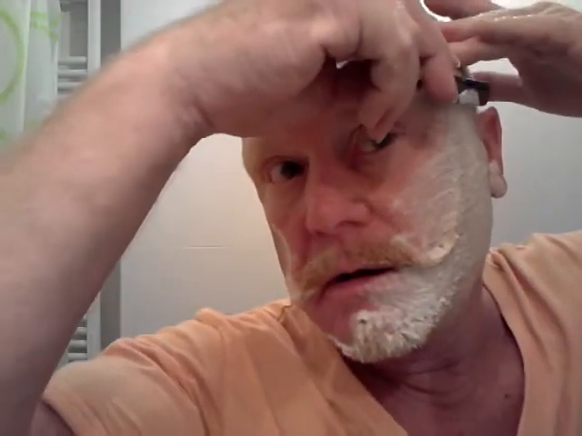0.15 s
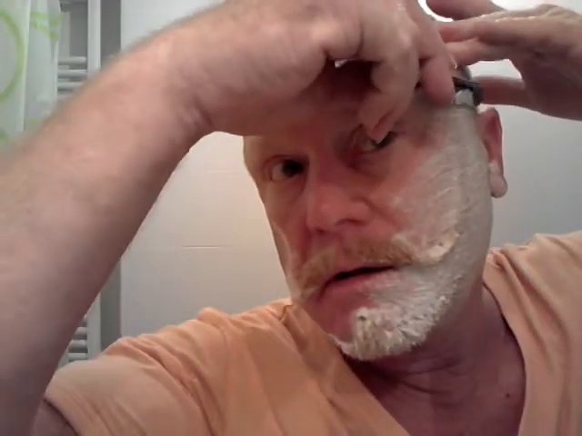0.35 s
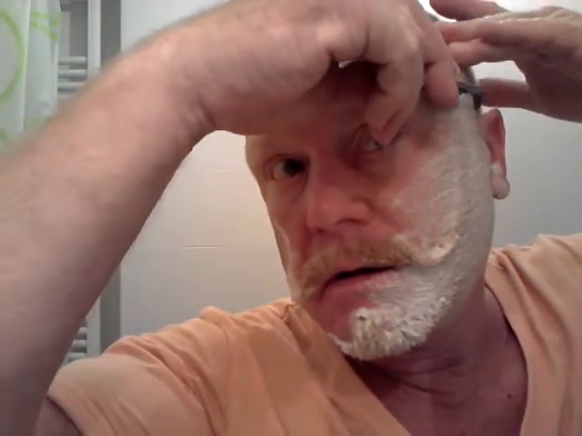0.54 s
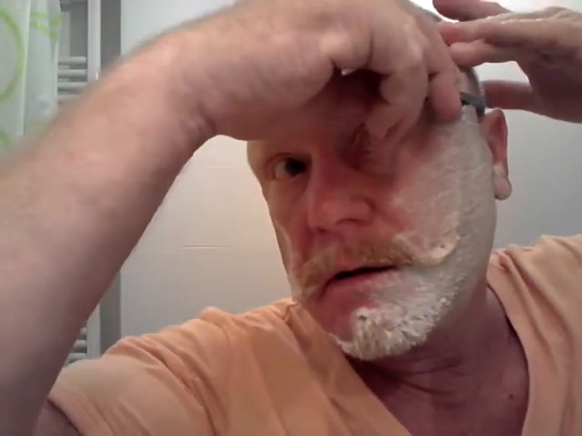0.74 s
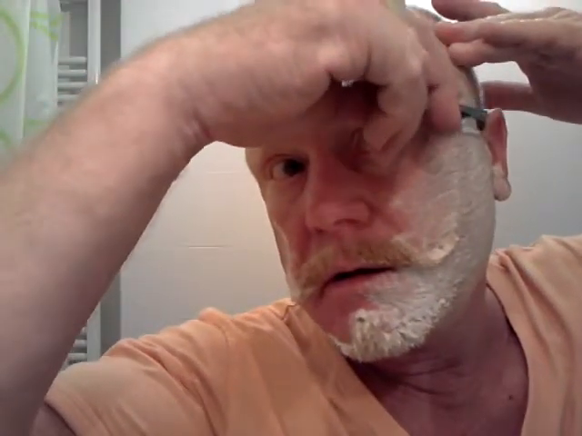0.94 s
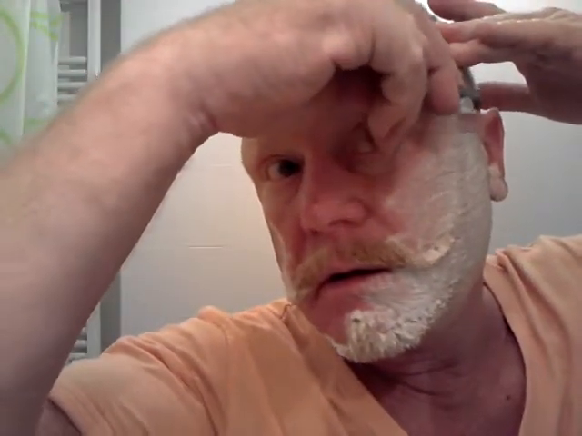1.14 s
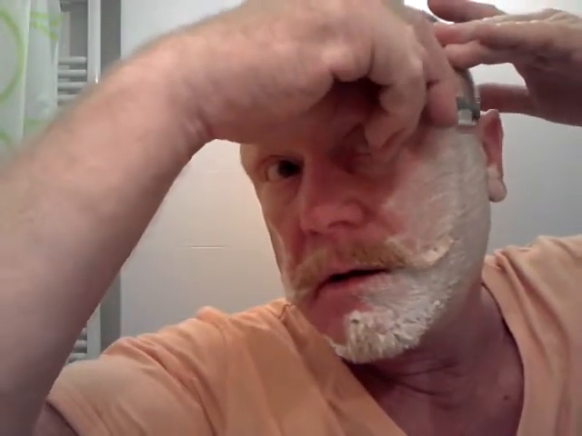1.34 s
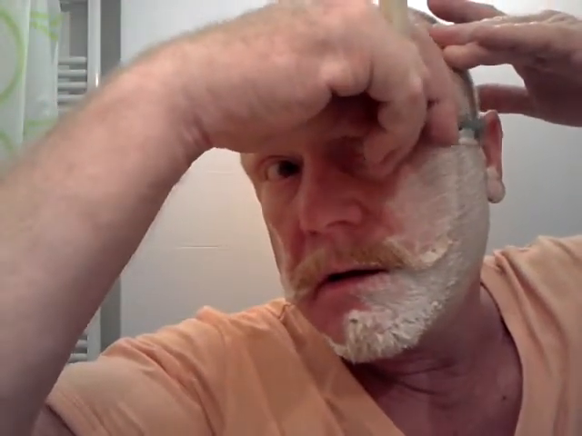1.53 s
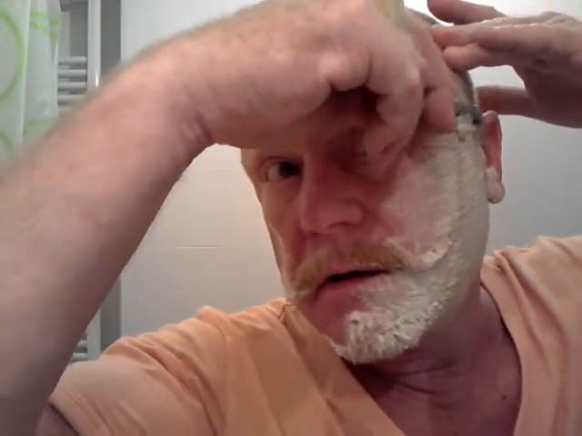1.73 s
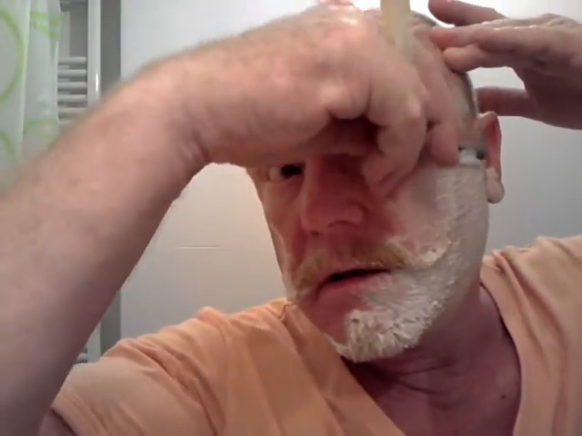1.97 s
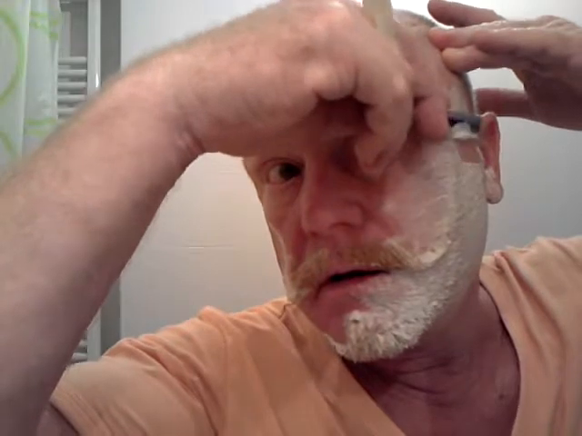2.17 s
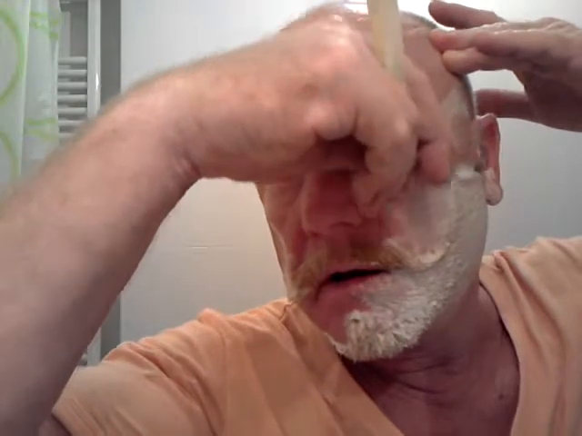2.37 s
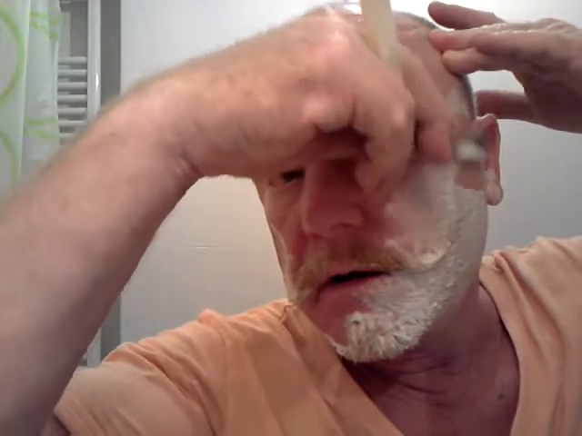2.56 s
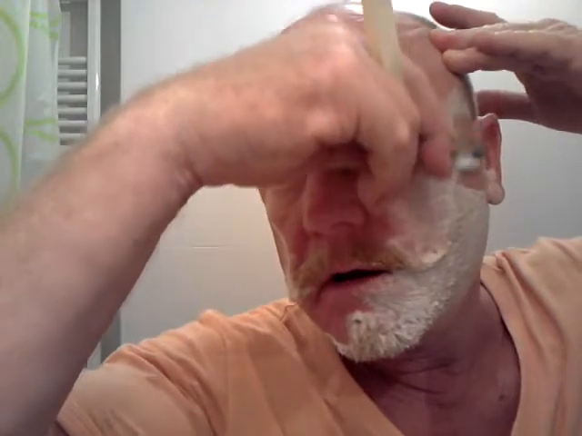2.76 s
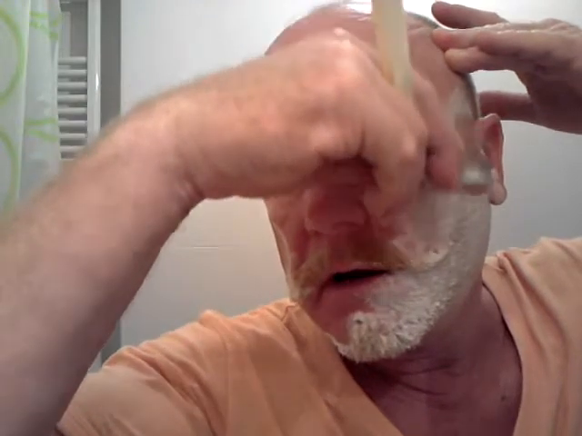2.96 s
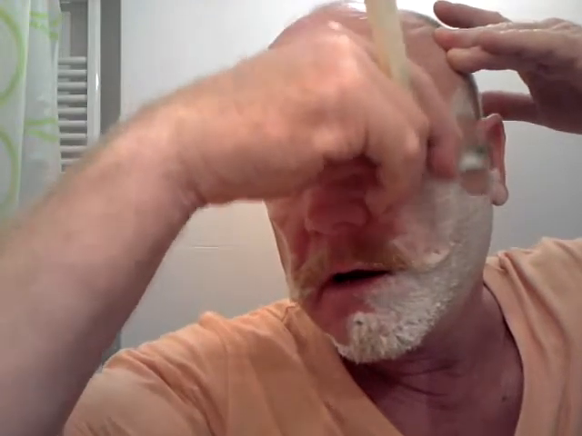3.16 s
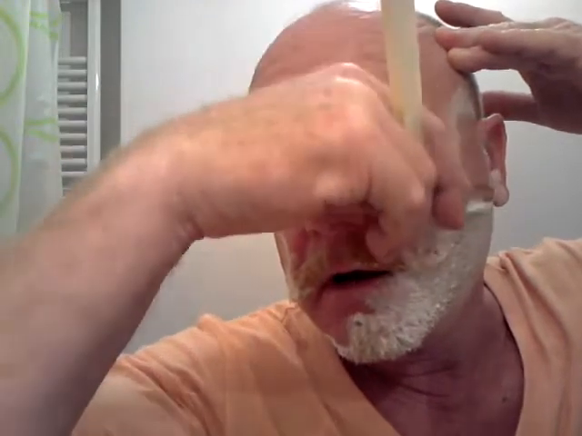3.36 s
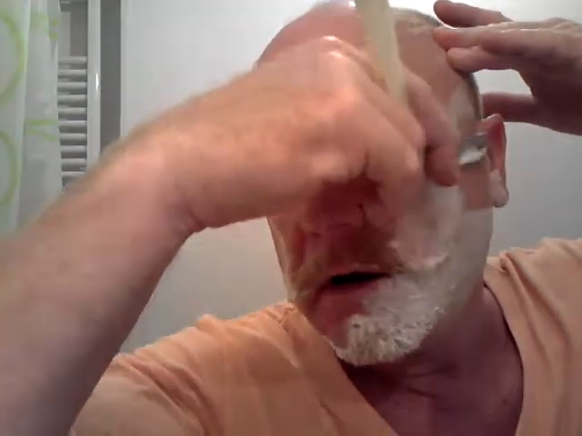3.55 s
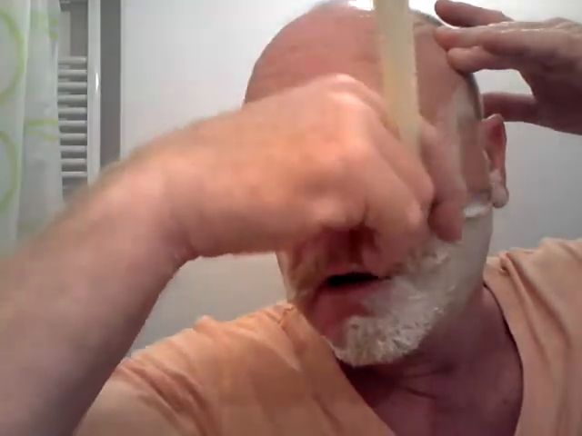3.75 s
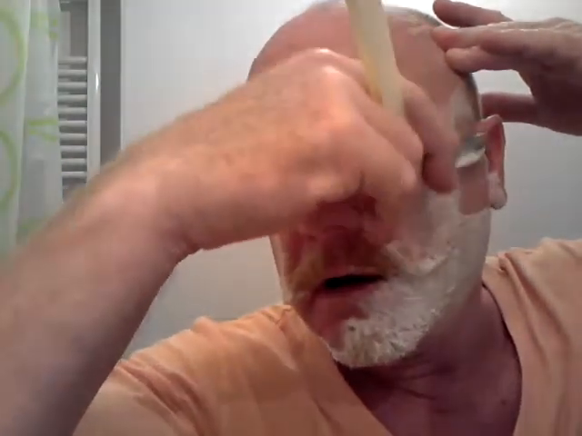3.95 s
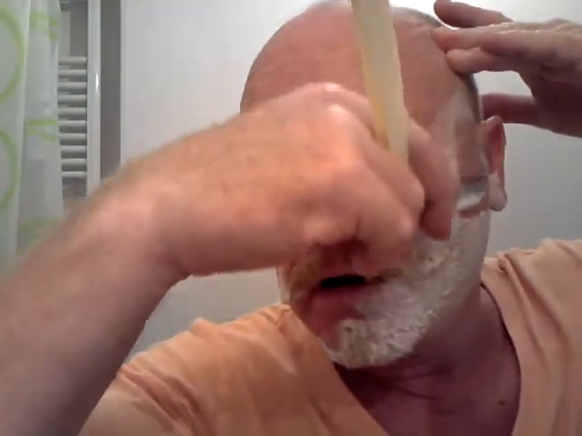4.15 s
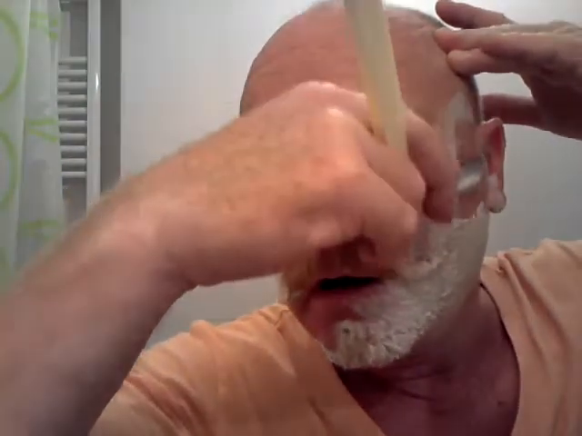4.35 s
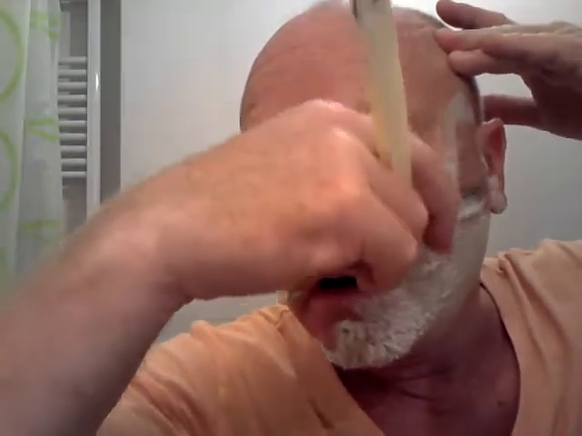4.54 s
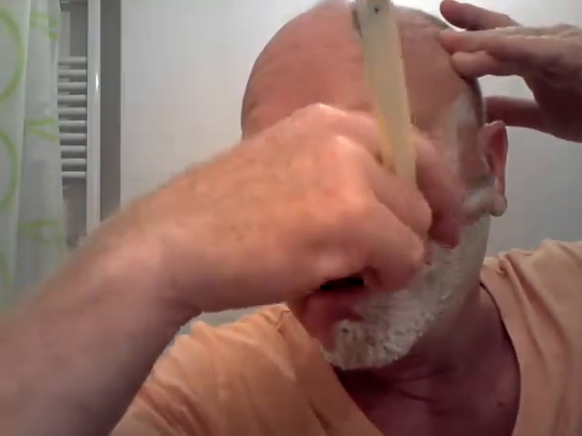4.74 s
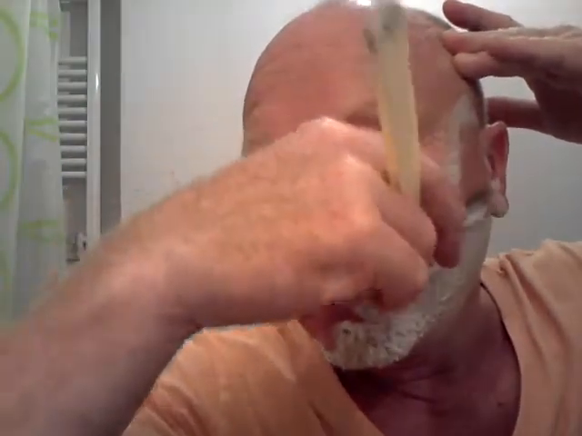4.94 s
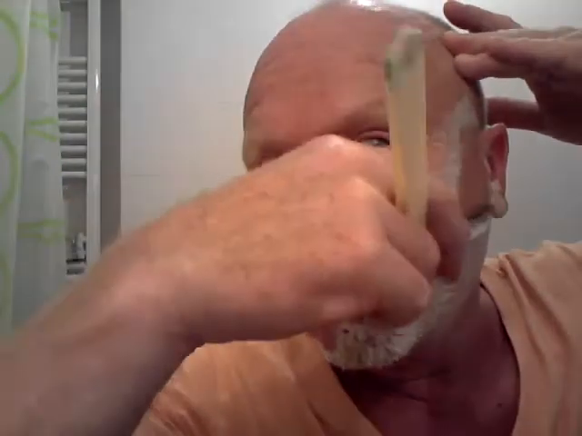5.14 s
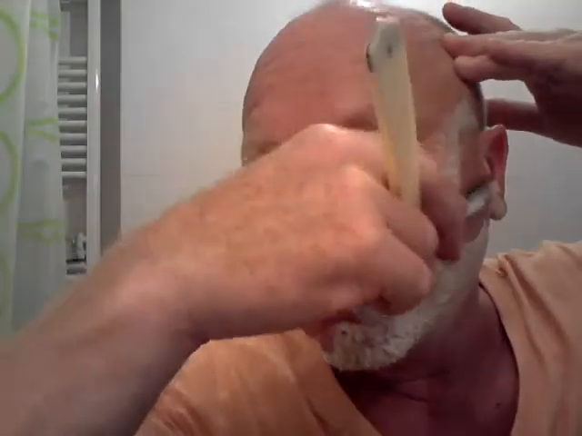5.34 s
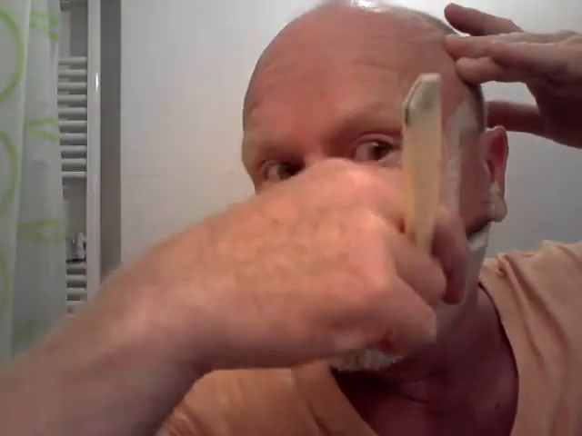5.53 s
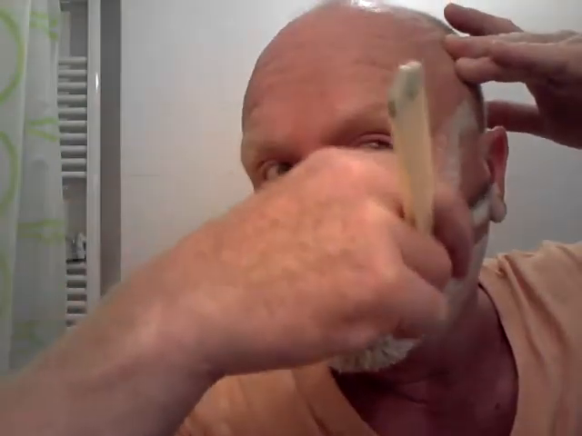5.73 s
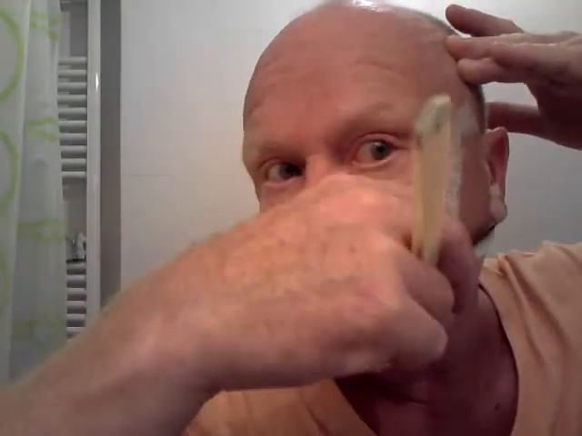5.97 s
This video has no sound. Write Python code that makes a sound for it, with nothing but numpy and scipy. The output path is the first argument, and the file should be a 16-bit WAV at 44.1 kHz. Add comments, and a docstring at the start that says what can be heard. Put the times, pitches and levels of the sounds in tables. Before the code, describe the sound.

Quiet fan air with a faint wavering duct hum runs throughout. Over it, a blade cuts lathered stubble in irregular brief strokes, each biting in quickly and stopping abruptly. Early strokes are thin and hissy; later ones are louder, grittier and dotted with sharp hair snaps. Close stereo pickup in a small reflective bathroom, the treble of the razor stronger on the right.

```python
"""An extractor fan hums steadily in a small tiled bathroom: coloured noise for air, wavering tones for its duct.
Then a straight razor is drawn down a lathered temple and cheek in sixteen short pulls, with soft grazes between.
Every cut hair is a tiny random snap that sets the thin blade ringing, and thick hairs add louder snaps.
The scrape is a fine sizzle at first, then a fuller rasp in the coarse beard; the tiles echo it."""
import sys
import numpy as np
from scipy import signal
from scipy.fft import rfft, irfft, next_fast_len
from scipy.io import wavfile
from scipy.ndimage import uniform_filter1d

SR = 44100
rng = np.random.default_rng(int(sys.argv[2]) if len(sys.argv) > 2 else 0)


def to_wav(sig):
    """Store sig (one row per channel, or 1-D mono) as 16-bit WAV at the path in sys.argv[1].

    Samples outside -1..1 are clipped; the rate is SR.
    """
    pcm = np.clip(np.atleast_2d(sig), -1, 1) * 32767
    pcm = np.round(pcm).astype(np.int16)
    wavfile.write(sys.argv[1], SR, pcm.T)  # frames by channels


N = 269010
TIME = np.arange(N) / SR   # seconds


def from_db(db):
    """Decibels to gain."""
    return 10 ** (np.asarray(db) / 20)


def rms_one(x):
    """Scale to unit rms."""
    return x / np.sqrt(np.mean(x ** 2) + 1e-20)


def at_hz(points, hz):
    """Read a table between its points, on a log-frequency axis."""
    known_hz, values = np.transpose(points)
    return np.interp(np.log(np.maximum(hz, 1)), np.log(known_hz), values)


def pan(left_right_db):
    """Left and right gains of constant total power."""
    gains = from_db(np.array([left_right_db, -left_right_db]).reshape(2, -1) / 2)
    return gains / np.sqrt(np.mean(gains ** 2, axis=0))


def colour(x, gain_at, size=2048):
    """Filter without pre-echo (minimum phase) whose gain is a function of Hz."""
    cepstrum = irfft(np.log(gain_at(np.fft.rfftfreq(size, 1 / SR)) + 1e-9))
    # folding the second half onto the first makes the response start at once
    cepstrum[..., 1:size // 2] *= 2
    cepstrum[..., size // 2 + 1:] = 0
    response = irfft(np.exp(rfft(cepstrum)))
    return signal.fftconvolve(np.atleast_2d(x), np.atleast_2d(response), axes=1)[:, :N]


def resonate(x, hz, width_hz):
    """Two-pole resonance with gain 1 on top."""
    r = np.exp(-np.pi * width_hz / SR)
    feed = np.array([1, 0, -1]) * (1 - r * r) / 2
    feedback = [1, -2 * r * np.cos(2 * np.pi * hz / SR), r * r]
    return signal.lfilter(feed, feedback, x + 1e-18)


def drift(rate_hz):
    """Slow random wandering with rms 1."""
    size = next_fast_len(N)
    hz = np.fft.rfftfreq(size, 1 / SR)
    slow = rfft(rng.standard_normal(size)) / (1 + (hz / rate_hz) ** 2)
    return rms_one(irfft(slow, size)[:N])


# Colour of the fan's air noise, sinking into microphone hiss.
# Each row: frequency in Hz, relative level in dB per Hz.
AIR_COLOUR = [(25, -16), (55, -17), (120, -8), (220, -4), (450, 1), (650, -3.5), (1150, -1.5), (1450, -6),
              (1800, 0.5), (2100, -3.5), (2650, -7), (3400, -13.5), (5500, -17.5), (14500, -17.5)]
AIR_DB = -51.5   # level of the whole air noise, dB rms
# How alike the air noise is at the two microphone ports.
# Each row: frequency in Hz, likeness from -1 (opposite) to 1 (the same).
AIR_LIKENESS = [(40, -0.8), (130, 0.04), (270, 0.5), (550, 0.54), (1100, 0.11), (3000, 0), (14000, 0)]
# Side balance of the air noise. Each row: frequency in Hz, left minus right in dB.
AIR_BALANCE = [(40, 8), (150, 2.5), (300, 1.5), (600, -2), (2000, 0), (5000, 0.5), (14000, -1)]
# Hum of the fan and its duct.
# Each row: frequency in Hz, half-width in Hz, relative level in dB, left minus right in dB.
DUCT_TONES = [(100, 3, -83, 4), (194, 5, -72, 5), (274.5, 5, -63.3, 4), (357, 8, -71, 0), (490, 5, -69, 0),
              (524, 5, -70.5, -2), (552, 10, -70.5, 0), (694, 4, -74.5, -6), (786, 5, -73, -2),
              (819, 4, -71.5, -7), (985, 4, -67.5, -4), (1141, 9, -66, 4), (1310, 12, -72, 3),
              (1412, 16, -71, -6), (1615, 12, -67.5, 0), (1665, 26, -68, -5), (1744, 8, -66.5, -5),
              (1810, 40, -69.5, -1)]


def fan(hum_db=-1.0, tone_db=-4.0, waver=0.709):
    """Rushing air whose likeness left and right varies with pitch, and wavering duct tones in skirts of noise."""
    hz = np.fft.rfftfreq(N, 1 / SR)
    alike = np.clip(at_hz(AIR_LIKENESS, hz), -1, 1)
    mid, side = rfft(rng.standard_normal((2, N)))
    turbulence = np.sqrt((1 + alike) / 2) * mid + np.sqrt((1 - alike) / 2) * side * [[1], [-1]]
    air_shape = rms_one(from_db(at_hz(AIR_COLOUR, hz)))
    power = (from_db(AIR_DB) * air_shape * pan(at_hz(AIR_BALANCE, hz))) ** 2
    tones = 0
    for tone_hz, width_hz, db, left_right_db in DUCT_TONES:
        sides = pan(left_right_db)
        skirt = rms_one(1 / (1 + ((hz - tone_hz) / width_hz) ** 2))
        power = power + (from_db(db + hum_db) * skirt * sides) ** 2
        # the wider the resonance, the faster its phase wanders
        wander = np.cumsum(rng.standard_normal(N)) * np.sqrt(2 * np.pi * width_hz / SR)
        phase = 2 * np.pi * tone_hz * TIME + waver * wander
        tones = tones + from_db(db + tone_db) * sides * np.sqrt(2) * np.sin(phase)
    return irfft(turbulence * np.sqrt(power), N) + tones


# Pulls of the blade.
# Each row: start in seconds, bite-in in seconds, length to the lift in seconds, relative level in dB,
# swell from start to lift in dB, mid-stroke bulge in dB, place of contact from heel 0 to toe 1.
STROKES = [ (0.753, .04, .083, -45.5, 4.5, 0, .1), (0.906, .04, .049, -38, 0, 0, .12),
           (1.390, .027, .264, -49.8, -2.7, 2.6, .37), (1.849, .005, .069, -48.3, -2.5, .5, .2),
           (1.935, .053, .081, -34.2, -2.5, -.5, .35), (2.298, .057, .219, -37.7, 5.5, 2, .62),
           (2.719, .037, .271, -40.9, 4.5, 2, .64), (3.169, .017, .251, -40.1, 3, 4.2, .79),
           (3.623, .068, .213, -35.5, -.4, -1.8, 1), (4.052, .026, .234, -38.2, 3.8, -.7, .54),
           (4.412, .023, .027, -41.8, 0, 0, .45), (4.510, .053, .181, -37.2, -2, 0, .46),
           (4.915, .033, .141, -37.5, -1, 1.6, .44), (5.058, .013, .067, -33.2, -1, .5, .42),
           (5.376, .045, .199, -34.8, -2.5, -3.5, .25), (5.800, .011, .171, -36.4, -6, -2, .05), ]
# Between pulls the blade grazes the lather on its way back.
# Each row: middle in seconds, half-length in seconds, relative level in dB.
GRAZES = [(1.238, 0.034, -61.0), (1.334, 0.024, -56.5), (1.759, 0.041, -53), (2.09, 0.035, -50.5),
          (2.26, 0.065, -54), (4.379, 0.02, -53), (4.776, 0.012, -48.2), (5.22, 0.033, -53),
          (5.306, 0.021, -51.2), (5.651, 0.008, -48.5), (5.732, 0.038, -60), (6.071, 0.044, -55.5)]
BITE_DB = 17.4   # rise of the scrape while the edge bites in
LIFT_DB_PER_S = 477   # its fall as the edge leaves the skin
GRAZE_EDGE_DB = 7   # how much weaker a graze is one half-length from its middle


def stroke_gain():
    """Each pull bites in, swells or eases along an arch, and dies as the blade lifts; grazes are soft humps."""
    power = np.zeros(N)
    for start, bite_s, length_s, level_db, swell_db, bulge_db, _ in STROKES:
        t = TIME - start
        along = np.clip((t - bite_s) / max(length_s - bite_s, 1e-3), 0, 1)
        pull_db = level_db + swell_db * (along - .5) + bulge_db * np.sin(np.pi * along)
        bite_db = BITE_DB * np.maximum(1 - t / bite_s, 0)
        lift_db = LIFT_DB_PER_S * np.maximum(t - length_s, 0)
        power += (t > 0) * from_db(pull_db - np.minimum(bite_db + lift_db, 100)) ** 2
    for middle, half_s, level_db in GRAZES:
        fall_db = GRAZE_EDGE_DB * ((TIME - middle) / half_s) ** 2
        power += from_db(level_db - np.minimum(fall_db, 100)) ** 2
    return np.sqrt(power)


def cut_hairs(per_s, spread_db, clump_db, friction_db, size=1500):
    """Hairs of uneven thickness part at random, in clumps, over the smooth friction of the edge; rms near 1."""
    cut = rng.random(N) < per_s / SR
    sizes = from_db(spread_db * rng.uniform(-0.95, 1, N)) * rng.choice([-1, 1], N)
    friction = from_db(friction_db) * rng.standard_normal(N)
    force = (rms_one(cut * sizes) + friction) * from_db(clump_db * drift(130))
    # the hand pulls evenly, so the power holds steady over a few hundredths of a second
    return force / np.sqrt(uniform_filter1d(force ** 2, size) + 1e-9)


# Thick hairs that part with a snap of their own, and the edge touching down.
# Each row: time in seconds, relative strength in dB.
THICK_SNAPS = [(0.8325, -29), (1.8557, -28), (2.2325, -32.5), (2.7003, -32.5), (2.9606, -17.7),
               (3.4227, -17.5), (3.456, -22.5), (3.654, -24.5), (3.833, -17), (4.157, -17.5),
               (4.562, -19.0), (4.6387, -20), (5.0692, -17.5), (5.3801, -26.5), (5.8246, -21.5),
               (5.9296, -18.2), (5.9488, -16), (5.9778, -18)]


def thick_hairs(snap_db=0.0, tear_s=0.0016, size=400):
    """A thick hair tears in a noise burst that dies within a few milliseconds."""
    force = np.zeros(N + size)
    for (s, strength_db), fibres in zip(THICK_SNAPS, rng.standard_normal((len(THICK_SNAPS), size))):
        tear = fibres * np.exp(-TIME[:size] / tear_s)
        force[round(s * SR):][:size] += from_db(strength_db + snap_db) * tear / np.linalg.norm(tear)
    return force[:N]


# Ringing of the blade.
# Each row: frequency in Hz, width in Hz, relative level in dB, place from 0 to 1 where it is best excited.
BLADE_MODES = [(4700, 260, -16, 0.4), (5900, 320, -2.5, 0.96), (6700, 440, 1.5, 0.8), (7250, 270, 3, 0),
               (12030, 600, -4, 0.86)]


def blade(force, place, spectrum, ring_db):
    """Snaps take the colour of the stubble; the place of contact decides which modes of the blade ring."""
    def respond(x, where):
        """Add the ringing modes to the bare snaps and colour the sum."""
        ringing = 0
        for hz, width_hz, db, best in BLADE_MODES:
            push = x * (1 - np.abs(where - best))
            ringing = ringing + from_db(db + ring_db) * resonate(push, hz, width_hz)
        return colour(x + ringing, lambda hz: from_db(at_hz(spectrum, hz)))[0]
    # one snap near the middle of the blade sets the reference loudness
    one_snap = respond(signal.unit_impulse(SR // 20), 0.42)
    return respond(force, place) / np.linalg.norm(one_snap)


# Colour of a snap in fine stubble. Each row: frequency in Hz, relative level in dB per Hz.
FINE_COLOUR = [(300, -30), (1000, -11), (2100, -8.5), (3000, -2.5), (4000, -9), (5400, -7.5), (7000, 1),
               (8200, 1.5), (10000, -7.5), (11800, -15.5), (13300, -10), (14600, -16.5)]
# Colour of a snap in coarse stubble. Each row: frequency in Hz, relative level in dB per Hz.
COARSE_COLOUR = [(300, -31), (900, -11.5), (2150, -11.5), (2800, -5.5), (3700, -1), (4400, 1), (5400, 0.5),
                 (7000, -1), (7900, -1), (10000, -8.5), (11200, -18), (14600, -28.5)]
# The stubble thickens from temple to cheek. Each row: time in seconds, coarseness from 0 to 1.
COARSENESS = [(0.8, 0.04), (1.85, 0.14), (2.45, 0.53), (3.75, 0.96), (5.9, 1)]


def razor():
    """The scrape passes from many fine hairs to fewer thick ones as the blade moves down into the beard."""
    start, _, length_s, *_, places = np.transpose(STROKES)
    place = np.clip(np.interp(TIME, start + length_s / 2, places), 0, 1)
    coarseness = np.clip(np.interp(TIME, *np.transpose(COARSENESS)), 0, 1)
    gain = stroke_gain()
    snaps = thick_hairs(snap_db=7.5)
    fine = gain * cut_hairs(per_s=3700, spread_db=9.0, clump_db=3.0, friction_db=-7.5)
    coarse = gain * cut_hairs(per_s=1700, spread_db=9.5, clump_db=2.5, friction_db=-10.0)
    sizzle = blade((fine + snaps) * np.sqrt(1 - coarseness), place, FINE_COLOUR, ring_db=5.5)
    rasp = blade((coarse + snaps) * np.sqrt(coarseness), place, COARSE_COLOUR, ring_db=1.0)
    return sizzle + rasp


# Echo of the tiled room. Each row: frequency in Hz, time in seconds for the echo to fall by 60 dB.
ROOM_T60 = [(500, 0.88), (3000, 0.42), (6500, 0.32), (13000, 0.27)]
LEFT_LAG = 8   # samples by which the direct sound reaches the left port later


def room_response(wet_db=4.0, early_db=1.0, early_s=.012, first_wall_s=.002, count=14):
    """Direct sound, a few hard reflections from mirror and tiles, then a tail that dies sooner in the treble."""
    t = TIME[:SR * 2 // 3]
    hz = np.fft.rfftfreq(len(t), 1 / SR)
    noise = rfft(rng.standard_normal((2, len(t))))
    centres_hz = np.array(ROOM_T60)[:, 0]
    tail = 0
    for band, (_, t60) in zip(np.eye(len(ROOM_T60)), ROOM_T60):
        share = at_hz(np.column_stack([centres_hz, band]), hz)
        tail = tail + irfft(noise * share, len(t)) * from_db(-60 * t / t60)
    tail *= np.clip(t / first_wall_s - 1, 0, 1)
    response = from_db(wet_db) * tail / np.linalg.norm(tail, axis=1, keepdims=True)
    for side in response:
        arrivals = ((first_wall_s + early_s * rng.random(count)) * SR).astype(int)
        side[arrivals] += from_db(early_db) * rng.choice([-1, 1], count) / np.sqrt(count)
    # the direct sound
    response[0, LEFT_LAG] += 1
    response[1, 0] += 1
    return response / np.linalg.norm(response, axis=1, keepdims=True)


def bathroom(x, moves_hz=18.5, count=4):
    """The razor travels several wavelengths in a stroke, so its sound wanders between sets of echo paths."""
    weights = np.array([np.exp(drift(moves_hz)) for _ in range(count)])
    # direct parts add in step, echoes in power
    weights /= np.sqrt(weights.sum(axis=0) * np.linalg.norm(weights, axis=0))
    heard = 0
    for weight in weights:
        heard = heard + signal.fftconvolve((x * weight)[None], room_response(), axes=1)[:, :N]
    return heard


# The razor is close to the right port, and the left one is shaded in the treble.
# Each row: frequency in Hz, left minus right in dB.
SHADE = [(1000, 1), (4500, -1.5), (5400, 2), (5900, 0), (6550, -8.5), (7400, -7), (8000, -10.5),
         (10000, -11), (11700, -2), (12700, -18), (14000, 0.5)]


def scene(razor_db=3.5):
    """The razor in its room, over the fan."""
    shave = colour(bathroom(razor()), lambda hz: pan(at_hz(SHADE, hz)))
    return from_db(razor_db) * shave + fan()


CUTOFF_HZ = 14600


def record(dry):
    """A steep low-pass filter removes the top of the treble."""
    return signal.sosfilt(signal.ellip(12, .1, 80, CUTOFF_HZ, fs=SR, output="sos"), dry)


dry = scene()
out = record(dry)
to_wav(out)
```